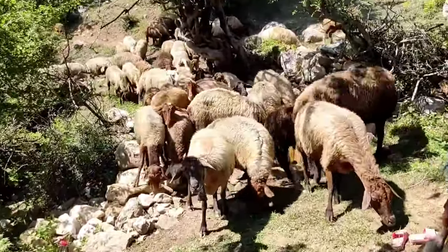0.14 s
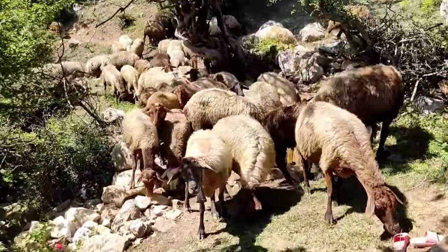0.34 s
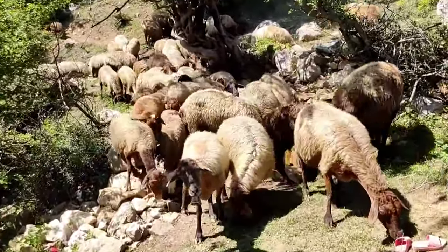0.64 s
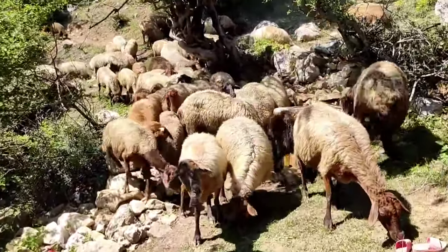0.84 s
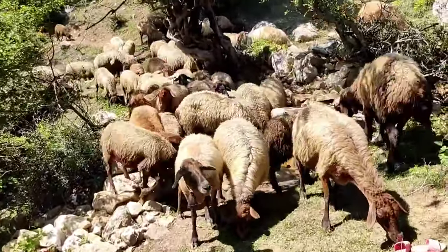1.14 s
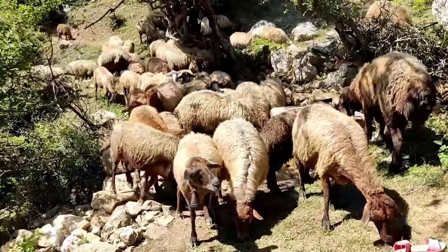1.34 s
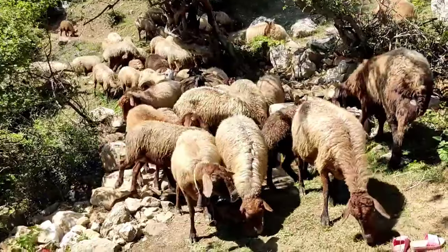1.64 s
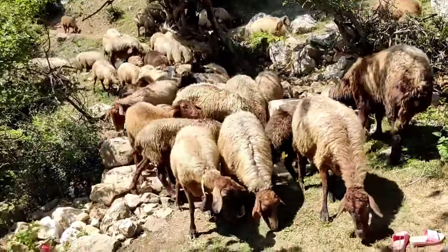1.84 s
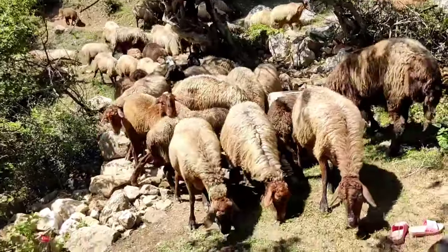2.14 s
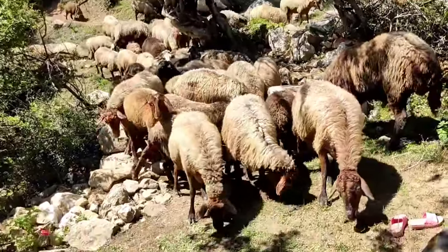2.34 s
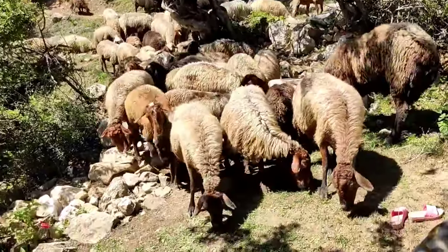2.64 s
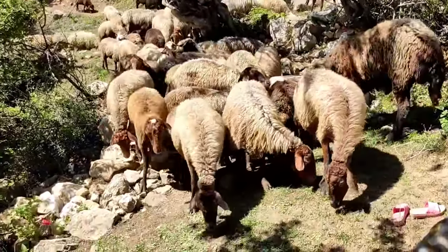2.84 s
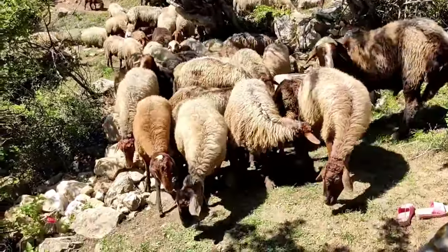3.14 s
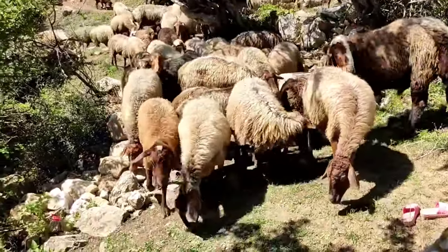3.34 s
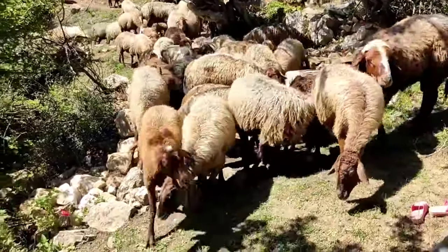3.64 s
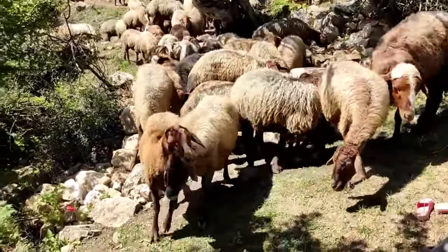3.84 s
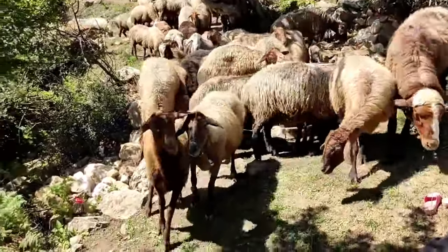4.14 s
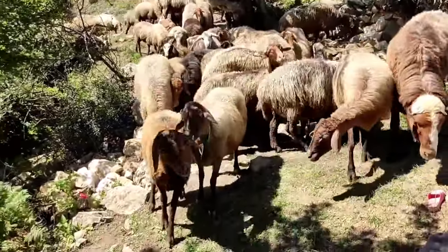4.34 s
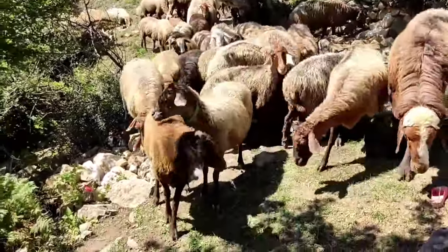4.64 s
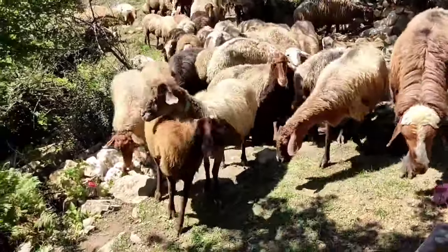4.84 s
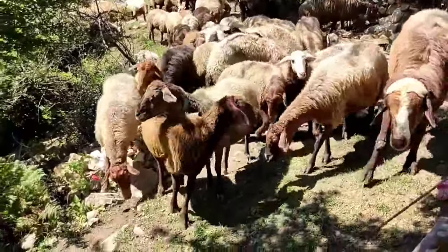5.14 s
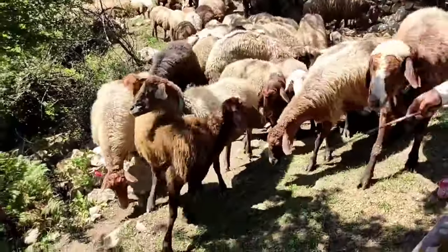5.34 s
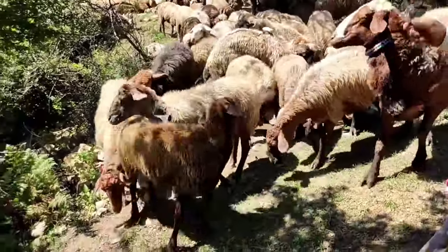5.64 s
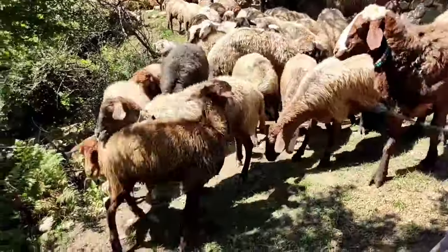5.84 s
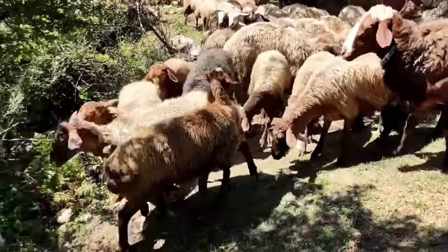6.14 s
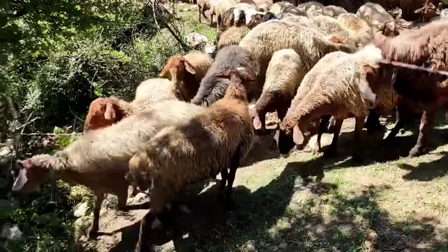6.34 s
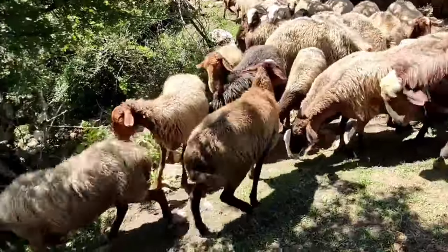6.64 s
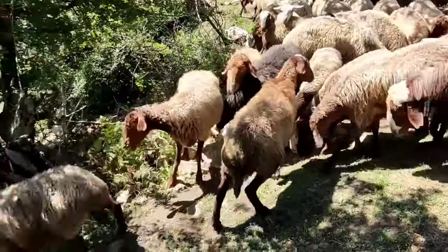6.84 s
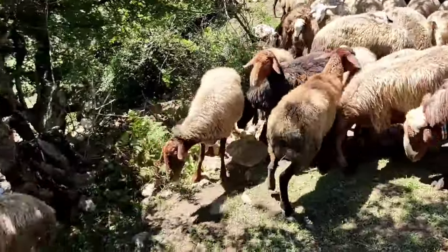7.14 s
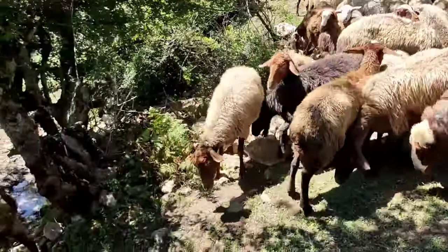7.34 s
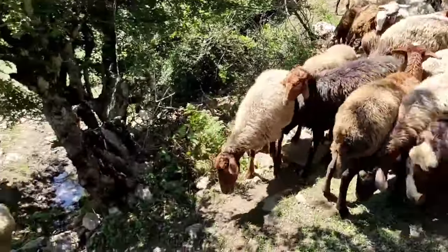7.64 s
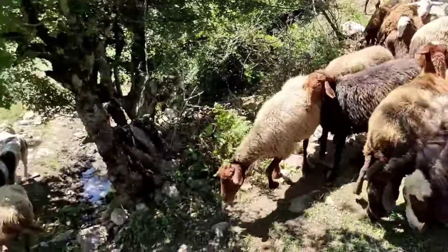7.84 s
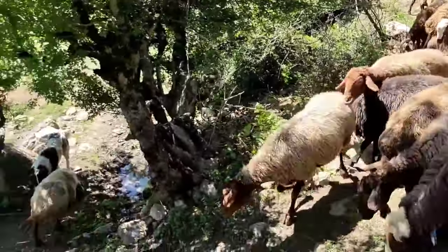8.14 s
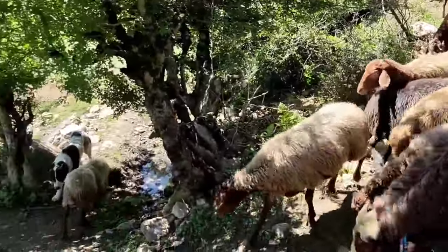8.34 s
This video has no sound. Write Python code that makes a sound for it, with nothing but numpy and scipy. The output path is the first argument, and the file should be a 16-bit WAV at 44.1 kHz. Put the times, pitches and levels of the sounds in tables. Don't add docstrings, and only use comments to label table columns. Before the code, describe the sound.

Outdoors on a breezy slope, wind rumbles and slaps a handheld stereo microphone. Dull distant bells and hoof knocks come first, with light metal grazes and a faint bird chirp. After two seconds a nearby sheet-metal bell clanks irregularly, bright and rattly with a short hollow ring. Two snorts follow closely, then a long sniff ends in a stronger snort, and later a weaker one and a sharp twig tick.

```python
import sys
import numpy as np
from scipy import signal
from scipy.fft import rfft, irfft, next_fast_len
from scipy.io import wavfile
from scipy.ndimage import uniform_filter1d, map_coordinates

SR = 44100
rng = np.random.default_rng(int(sys.argv[2]) if len(sys.argv) > 2 else 0)


def file_out(sig):
    cols = np.atleast_2d(sig).T
    lim = np.clip(cols, -1, 1)
    pcm = np.round(lim * 32767).astype(np.int16)
    wavfile.write(sys.argv[1], SR, pcm)


def voltage_ratio(decibels):
    exponent = np.asarray(decibels, float) / 20
    return 10 ** exponent


N = 373968

# time_s, level_db
BUFFET_LEVEL = [(0, -31), (.5, -30), (.95, -43.5), (1.3, -45.5), (2.7, -41.5), (3.1, -33.5), (3.8, -37),
                (4.4, -42), (4.8, -38), (5.6, -28.5), (6.3, -32.5), (7.15, -47.5), (7.7, -30.5), (8.1, -32),
                (8.48, -39.5)]
# time_s, gain_db
EDDIES = [(.1, 3.5), (.65, 2.5), (.897, 5), (2.5, 2.5), (2.75, -16), (3.02, 2), (3.179, 2.5), (3.3, -10),
          (3.42, -3), (3.6, 1), (3.8, 5.5), (3.94, -5), (4.055, 4), (4.8, 7.5), (4.98, -8), (5.09, -0.5),
          (5.23, 2), (5.518, 3.5), (5.655, 4), (7.719, 1.5), (7.885, 2), (7.965, 3.5), (8.27, -2.5),
          (4.62, 4.5), (4.7, 1.5), (4.88, -2), (8.19, 2.5)]
# peak_s, peak_db, pitch_hz, left_minus_right_db
SLAPS = [(0.029, -26.5, 80.7, -12.5), (0.096, -30.5, 130, 16), (0.301, -41, 83.4, 0),
         (0.395, -35, 87, -0.5), (0.638, -34, 80.7, -6), (3.013, -31.5, 96, -29), (3.413, -34.5, 113, -19),
         (3.598, -34, 107, -9), (4.048, -38.5, 143, 16.0), (4.777, -32, 112, 14),
         (5.083, -33.5, 121, -13.0), (5.222, -40, 180, 12.5), (5.46, -29, 80.7, 4), (5.514, -24.5, 127, 10),
         (5.709, -33, 105, 14), (6.271, -39, 116, -14), (7.717, -25, 143, 33), (7.878, -28, 120, 11),
         (7.96, -23, 82, -12), (8.126, -35.5, 128, -15.5), (8.181, -31, 96, -19), (8.264, -36, 78.5, -6.5)]
# freq_hz, level_db
BUFFET_SPECTRUM = [(8.8, -45), (15, 4.5), (32, 5.5), (75, 1.5), (103, -10.5), (130, -14), (170, -17.5),
                   (290, -120)]
# freq_hz, level_db
FLUTTER_SPECTRUM = [(53, -17), (90, 0.5), (200, -13.5), (242, -13.5), (359, -29.5), (500, -30.5),
                    (650, -57), (1100, -120)]
# time_s, level_db
RUSTLE_LEVEL = [(0, -42), (.3, -46), (1.8, -49), (3.0, -45.5), (3.5, -47.5), (5.2, -44), (5.75, -36.5),
                (6.3, -46), (7.0, -50), (8.08, -43), (8.48, -49)]
# freq_hz, level_db
HISS_SPECTRUM = [(2650, -17), (5480, -13.5), (7190, -6), (8320, -2.5), (10400, -5), (11400, -10),
                 (14000, -15), (15000, -68)]
# freq_hz, left_minus_right_db
HISS_LEAN = [(4400, -0.5), (7500, -3.5), (9000, -4.5), (10500, 6.5), (14000, 2.5)]
# start_s, hold_s, peak_db, rise_db_per_s, fall_db_per_s
PUFFS = [
    (2.467, 0.039, -24.5, 208, 400),
    (5.926, 0.011, -29, 258, 236),
    (6.57, 0.011, -41, 123, 150),
    (6.86, 0.0012, -43, 1500, 897),
    (7.475, 0.0079, -55, 198, 155),
    (4.256, 0.013, -63, 300, 500),
    (5.31, 0.0035, -41.5, 1487, 503),
]
# freq_hz, level_db
MURMUR_SPECTRUM = [(200, 4), (300, 1), (950, -1.5), (2200, -8), (3000, -30), (4200, -9), (7500, -50),
                   (12000, -120)]

# start_s, peak_db
LEADER = [(0.065, -38.5), (0.4302, -43), (0.7594, -43.5), (1.111, -40.5), (1.5196, -44.5), (2.0508, -49.5),
          (2.9, -43), (4.0619, -43), (4.9152, -45), (5.0959, -39), (5.3852, -49), (5.568, -47),
          (6.1312, -46), (7.505, -48.5), (7.649, -42)]
# start_s, peak_db, pitch_hz
DEEP = [(0.059, -43, 791), (0.237, -52, 817), (0.604, -53, 836), (1.29, -45, 811), (4.01, -45, 824),
        (4.185, -51, 778), (6.822, -55, 826), (6.999, -47.5, 820), (7.16, -41.5, 810), (7.392, -48.5, 816),
        (7.664, -52, 794), (7.969, -49, 790), (8.099, -49, 800)]
# start_s, peak_db
HIGH = [
    (2.2483, -41),
    (2.4892, -42.5),
    (2.641, -39),
    (3.044, -40.5),
    (3.2708, -47),
    (3.362, -39),
    (4.465, -41),
    (5.6856, -44),
    (6.943, -48),
]
# start_s, peak_db, pitch_hz
STRAY = [(.15, -48, 809), (.18, -48, 960), (.68, -54, 1070), (.9, -57, 827), (1.3, -56, 902),
         (1.65, -51, 995), (1.7, -57, 880), (1.92, -48, 897), (2.4, -40.5, 926), (4.95, -50, 1040),
         (5.38, -57, 1053), (5.8, -47, 898), (7.7, -48, 918), (8.067, -47, 917), (8.249, -50, 905)]
# start_s, peak_db, pitch_hz
FAINT = [
    (.42, -56, 4580),
    (.59, -55, 4640),
    (.672, -47, 5230),
    (1.003, -53, 5280),
    (1.404, -53, 5180),
    (1.5, -56, 4320),
    (2.845, -49, 1717),
]

# start_s, length_s, level_db, start_hz
CHIRPS = [
    (1.24, .1, -55, 6100),
    (2.96, .07, -56, 6300),
    (7.49, .08, -56, 6800),
    (8.15, .06, -51, 5900),
]
# start_s, peak_db, knock_hz
HOOVES = [(0.507, -39, 850), (1.244, -37, 755), (1.421, -48.5, 1380), (2.904, -34, 1050), (3.802, -37, 410),
          (5.02, -40, 508), (5.327, -39.5, 483), (5.513, -28.5, 588), (5.725, -31.5, 940),
          (6.451, -37, 1010), (7.02, -37, 590)]
# start_s, peak_db
TWIGS = [
    (.0204, -19),
    (.156, -34),
    (.8275, -35),
    (2.846, -33),
    (2.905, -32),
    (5.3068, -30),
    (7.9195, -14),
]
# freq_hz, level_db
SNIFF_SPECTRUM = [(5000, -44), (7600, -24), (8400, -4), (9200, -11), (10300, -2), (11500, -12),
                  (14000, -13), (16000, -74)]
# start_s, hold_s, level_db, nose_start_hz, nose_end_hz
SNORTS = [
    (2.325, 0.044, -42.5, 2050, 2100),
    (2.458, 0.058, -32, 1980, 2040),
    (5.928, 0.032, -26.5, 5950, 2300),
    (7.481, 0.026, -35, 2780, 1640),
]
# resonance_width_ratio, flap_hz, flap_db
NOSTRILS = [
    (15.8, 225, 12),
    (28, 200, 9),
    (1.77, 180, -30),
    (0.169, 520, -16),
]

# start_s, ring_db, mouth_db
BLOWS = [(2.2483, -16.5, -20), (2.638, -14.5, -15.5), (3.039, -25.5, -41.5), (3.1975, -14.5, -23),
         (3.3607, -16.5, -18), (3.5339, -18.5, -18), (3.8511, -11, -12), (3.921, -15.5, -15),
         (4.07, -17, -23.0), (4.3002, -11, -17), (4.4658, -17, -29), (4.489, -20.2, -63.0),
         (4.6689, -25.5, -21.5), (5.679, -14, -38), (6.0036, -22.5, -32), (6.3637, -17, -22),
         (6.3907, -17.5, -46), (6.6199, -17, -7.5), (6.733, -15, -21.5), (6.9424, -17.5, -33),
         (7.014, -25, -25.0), (7.154, -17.5, -27.5), (7.9848, -19, -23), (8.461, -15.5, -18.5)]
LANDINGS = [(1.8, -0.06, -0.27, 0.25), (1.81, 0.61, -1.05, 0.11), (-0.2, 0.19, 0.85, -1.54),
            (-0.09, 0.38, 0.74, -0.75), (0.93, -0.18, 0.99, -0.77), (-0.84, -0.7, 0.74, -0.52),
            (-0.27, 0.23, 0.57, -0.18), (0.03, -0.58, -0.08, -1.6), (2.26, 2.64, -1.65, 0.29),
            (0.45, 1.07, -0.78, 0.51), (-1.05, 1.16, -0.24, -0.07), (-0.55, 0.74, 0.05, 0.03),
            (-0.21, -0.07, 0.1, -0.98), (-0.53, -0.66, -0.74, 0.08), (-0.16, -0.03, 0.05, -0.09),
            (0.47, -0.23, -0.04, -0.28), (-0.49, 0.55, -0.29, -0.83), (-0.08, -0.64, -0.4, -1.19),
            (1.24, 1.26, -0.72, -0.69), (-0.61, -0.73, 0.0, 0.09), (-0.63, -1.03, 0.04, -0.94),
            (-0.51, 0.43, 0.22, -0.87), (0.79, 0.78, -0.44, -0.53), (-0.01, -1.82, 0.69, 0.41)]
# start_s, ring_db, mouth_db, height, round_rim (relative units)
GRAZES = [(0.0538, -27.5, -39, 0.081, 0.5), (0.177, -25.5, -50, 0.19, -0.82),
          (1.289, -28, -65.0, -0.46, -0.58), (1.6465, -30, -47, 0.41, 0.57),
          (2.0342, -30.5, -60, 0.19, -0.32), (2.34, -33, -30, 0.56, 0.3),
          (3.456, -22, -26.5, -0.019, -0.34), (3.5959, -22, -35.0, -0.67, -0.66),
          (3.649, -29, -27.5, 0.038, 0.089), (4.0035, -32, -65.0, -0.47, -0.56),
          (4.3989, -24, -20.5, -0.54, -0.76), (4.7037, -24, -27.5, -0.24, 0.65),
          (5.7999, -23, -40, 0.3, -0.077), (6.03, -26.5, -61, 0.19, -0.62),
          (6.2149, -27, -30.0, 0.079, -0.14), (6.2496, -24, -35.5, 0.98, 0.81),
          (6.42, -25.5, -23.5, -0.49, -0.64), (6.475, -32.5, -36.5, 0.12, -0.44),
          (6.826, -29, -30.5, 0.45, 1.1), (7.338, -28.5, -30, 0.54, 0.66),
          (7.659, -33, -30.5, -0.27, -0.44), (7.825, -32, -35, 1, -0.083), (8.1836, -24, -48, -0.02, 0.16),
          (8.225, -30, -38.5, -0.9, -1.26), (8.367, -32.5, -46, 0.96, -1.1),
          (3.797, -31.5, -47, 0.1, 0.093),
    (5.704, -32, -62, 0.1, 0.1),
    (5.732, -30, -45, 0.1, 0.1),
    (6.968, -27, -60, 0.09, 0.1),
    (7.041, -30.5, -60, -0.1, 0.1),
    (7.931, -27.5, -55, 0.1, 0.091),
    (8.005, -26.5, -60, 0.1, 0.1),
]
WALL_HZ = [1650, 2406, 2541, 2632, 2842, 3025, 3171, 3478, 3714, 3957, 4094, 4352, 4506, 4618, 4825, 5297,
           5373, 5742, 5997, 6110, 6325, 6815, 6944, 7402, 7601, 7948, 8505, 8590, 8984, 9625, 9856, 10120,
           10524, 11019, 11325, 11730, 12015, 12270, 12720, 13300]
# level_db, t60_s
WALL_MODES = [(-37, 0.25), (-40, 0.34), (-42.0, 0.32), (-42.7, 0.25), (-33.5, 0.31), (-34, 0.28),
              (-39.5, 0.089), (-40.5, 0.089), (-36, 0.17), (-38, 0.1), (-28.5, 0.27), (-22, 0.36),
              (-39, 0.106), (-23, 0.24), (-22, 0.26), (-18.5, 0.36), (-19.5, 0.21), (-35, 0.091),
              (-36.3, 0.2), (-22, 0.14), (-27.5, 0.15), (-19.5, 0.17), (-24, 0.23), (-12.5, 0.17),
              (-10.5, 0.18), (-8.5, 0.13), (-10.5, 0.12), (-15, 0.13), (-33, 0.16), (-12, 0.098),
              (-4.5, 0.082), (-2, 0.032), (-20.5, 0.1), (-24, 0.073), (-14, 0.041), (-21, 0.082),
              (-14, 0.087), (-11, 0.039), (-36.3, 0.15), (-22, 0.14)]
# height_db, round_rim_db, slant_db, flatness_db
WALL_SHAPES = [(-0.5, -1.7, 1.8, -4.3), (0.1, -1.2, -0.9, -2.7), (1.9, -1.5, -2.7, -2.4),
               (0.2, -1.5, -3.3, -3.1), (3.7, 1.3, -1.6, -2.0), (-3.9, 1.6, 4.3, -8.0),
               (5.2, -1.2, 7.3, -7.8), (0.9, 3.7, 6.0, 2.1), (-1.9, -0.3, -1.1, -2.2),
               (-4.5, -0.6, 3.1, 2.9), (-7.4, 3.2, 15.3, 1.0), (-0.4, 3.1, 6.7, 8.1), (1.5, 1.4, 1.4, -0.3),
               (5.8, 5.2, 9.0, -3.0), (-1.1, -6.8, -3.7, -6.1), (1.5, -1.5, 1.2, 4.3),
               (-3.4, -4.5, -3.7, 4.1), (-0.8, -2.6, -1.2, 1.1), (2.2, -0.2, 0.7, -0.3),
               (-1.0, 1.3, 0.5, -1.8), (2.6, 3.3, -0.0, 0.9), (-1.0, -3.9, 2.0, -4.9),
               (-0.7, -0.6, -0.0, -0.4), (-1.6, 1.0, -4.1, 1.7), (0.5, -3.1, 3.7, 7.3),
               (-7.3, 6.5, -3.8, 10.1), (-2.6, 3.2, -6.9, -11.3), (2.8, -1.5, -10.6, -6.4),
               (-0.5, -0.3, 0.0, 0.0), (3.5, -1.1, 1.7, 6.5), (1.7, -1.0, -1.2, 1.3), (2.2, 0.1, 4.0, -4.3),
               (4.9, -0.2, 0.2, 5.2), (5.5, 1.2, -1.5, 1.7), (2.6, -0.4, -4.9, 5.3),
               (-3.4, -0.5, -0.7, -0.2), (0.2, -0.9, 3.9, -3.0), (-5.0, 3.5, 0.6, 1.6),
               (-0.0, -0.2, -2.5, 0.3), (2.5, -1.8, -2.2, 1.0)]
# freq_hz, level_db
CLACK_SPECTRUM = [(700, -7), (2000, -4), (3400, -13.5), (5000, -5.5), (6000, -14.5), (8500, -1.5),
                  (10500, -2.5), (12300, -5), (14000, -10.5)]
# freq_hz, left_minus_right_db
BELL_LEAN = [(1050, 0), (4700, -4.5), (5400, -3), (6800, -5.5), (7700, -7.5), (8600, -9), (9900, 7),
             (13000, 3.5)]
# freq_hz, left_lead_rad
BELL_TURN = [(1000, 1.1), (3000, 1.7), (8000, 1.1), (12000, .8)]
# freq_hz, threshold_db
DROPOUT = [(1400, -16), (1900, -11), (2400, -9), (2900, 0), (3800, 1), (4500, -3), (5800, 3), (6600, -1),
           (12000, -4), (14000, -9)]

MOUTH_HZ, LEADER_HZ, HIGH_HZ = 1033, 931, 1132
EDDY_S, FLUTTER_DB, FLUTTER_GROWTH = 0.05, -8, 1.87
SLAP_DECAY_S, SLAP_LATE_S, SLAP_GAIN_DB, SLAP_PITCH_RATIO = .006, .005, 5, 1.35
KNOCK_T60_S = .06
SNIFF_START_S, SNIFF_LENGTH_S, SNIFF_EDGE_S = 5.4, 0.528, 0.03
SNIFF_DB, SNIFF_SWELL_DB = -34, 8.5
SNIFF_BURST_DB, SNIFF_BURST_S, SNIFF_FLAP_HZ = 11.5, .016, 205
SNORT_ATTACK_S, SNORT_RELEASE_S, SNORT_EDGE_DB = .035, 0.047, -32
UPPER_NOSE_RATIO, UPPER_NOSE_DB = 1.87, -16.5
SWING_DB = 5
MOUTH_SCATTER_RAD = .1


def unit(x):
    return x / np.sqrt(np.mean(x ** 2) + 1e-20)


def along(points, hz):
    f, v = np.transpose(points)
    return np.interp(np.log(hz + 1), np.log(f + 1), v)


def level_curve(points):
    s, db = np.transpose(points)
    return np.interp(np.arange(N) / SR, s, db)


def bumps(events, width_s):
    t = np.arange(0, N + 32, 32) / SR
    total = sum(db * np.exp(-((t - s) / width_s) ** 2 / 2) for s, db in events)
    return np.interp(np.arange(N) / SR, t, total)


def wobble(rate_hz, count=N):
    knots = rng.standard_normal(int(count * rate_hz / SR) + 4)
    return map_coordinates(knots, [np.arange(count) * rate_hz / SR])


def filtered(x, response):
    m = next_fast_len(N + SR // 2)
    return irfft(rfft(x, m) * response(np.fft.rfftfreq(m, 1 / SR)), m)[..., :N]


def rush(spectrum, alike, patchy_db):
    z = signal.stft(rng.standard_normal((2, N)), nperseg=512)[2]
    field = uniform_filter1d(rng.standard_normal(z.shape[1:]), size=6, axis=0)
    field = uniform_filter1d(field, size=10, axis=1)
    a, b = signal.istft(z * voltage_ratio(patchy_db * unit(field)), nperseg=512)[1][:, :N]
    turn = np.arccos(np.clip(alike, -1, 1)) / 2
    pair = np.cos(turn) * a + np.sin(turn) * np.array([b, -b])
    return unit(filtered(pair, lambda hz: voltage_ratio(along(spectrum, hz))))


def add(track, s, sound):
    part = track[..., round(s * SR):][..., :sound.shape[-1]]
    part += sound[..., :part.shape[-1]]


def ring(hz, db, t60_s, attack_s, scatter_rad, rough_db=3.0, in_step=False, longest_s=.27):
    hz, db, t60_s = (np.reshape(v, (-1, 1)) for v in (hz, db, t60_s))
    count = next_fast_len(int(SR * min(.85 * t60_s.max(), longest_s)), True)
    t = np.arange(count) / SR
    draws = 1 if in_step else hz.shape
    phase = rng.uniform(0, 2 * np.pi, draws)
    stray = scatter_rad * rng.standard_normal(draws)
    knots = rng.standard_normal((2, len(hz), 24), np.float32)
    swell, slip = signal.resample(knots, count, axis=2)
    fade = voltage_ratio(np.float32(db - 60 * t / t60_s + rough_db * swell)) * (1 - np.exp(-t / attack_s))
    cycle = 2 * np.pi * hz * t + phase + rough_db / 4 * slip
    lean = (along(BELL_LEAN, hz) + SWING_DB * scatter_rad * rng.standard_normal(draws)) / 2
    turn = (along(BELL_TURN, hz) + stray) / 2
    ports = [fade * voltage_ratio(k * lean) * np.sin(np.float32(cycle + k * turn)) for k in (1, -1)]
    return np.array([port.sum(0) for port in ports])


def slaps():
    out, t = np.zeros((2, N)), np.arange(-2000, 2000) / SR
    for (s, db, hz, pan_db), phase in zip(SLAPS, rng.uniform(0, 2 * np.pi, len(SLAPS))):
        share = voltage_ratio([[pan_db / 2], [-pan_db / 2]])
        envelope = np.exp(-np.abs(t) / SLAP_DECAY_S) + np.exp(-np.abs(4 * t) / SLAP_DECAY_S)
        crest = envelope * 0.65 * np.cos(2 * np.pi * SLAP_PITCH_RATIO * hz * t + phase)
        add(out, s + SLAP_LATE_S, voltage_ratio(db + SLAP_GAIN_DB) * 2 * share / share.sum() * crest)
    return np.roll(out, -len(t) // 2, axis=1)


def wind():
    eddy_db = bumps(EDDIES, EDDY_S)
    buffet_db = level_curve(BUFFET_LEVEL) + eddy_db
    flutter_db = buffet_db + (FLUTTER_GROWTH - 1) * eddy_db + FLUTTER_DB
    slow, fast = (2 * np.tanh(np.array([wobble(rate), wobble(rate)]) / 2) for rate in (9, 30))
    buffet = unit(voltage_ratio(2.5 * slow + 1.6 * fast) * rush(BUFFET_SPECTRUM, alike=-0.017, patchy_db=-1.44))
    flutter = unit(voltage_ratio(3.1 * slow + 6.4 * fast) * rush(FLUTTER_SPECTRUM, alike=0.029, patchy_db=1.1))
    return voltage_ratio(buffet_db + [[-1.2], [.6]]) * buffet + voltage_ratio(flutter_db) * flutter + slaps()


def murmur():
    return voltage_ratio(-52.0 + wobble(2.87) + wobble(26)) * rush(MURMUR_SPECTRUM, alike=0.38, patchy_db=4.0)


def rustle():
    t = np.arange(N) / SR
    level = voltage_ratio(level_curve(RUSTLE_LEVEL))
    for s, hold_s, db, rise, fall in PUFFS:
        drop_db = np.maximum(np.maximum(rise * (s - t), fall * (t - s - hold_s)), 0)
        level = level + voltage_ratio(db - drop_db)
    hiss = level * voltage_ratio(wobble(30) + wobble(10)) * rush(HISS_SPECTRUM, alike=0.49, patchy_db=2.2)
    return filtered(hiss, lambda hz: voltage_ratio(np.outer([.5, -.5], along(HISS_LEAN, hz))))


def back_of_flock(count=420):
    out, t = np.zeros((2, N)), np.arange(SR // 4) / SR
    for s, pitch, size, life, left in rng.random((count, 5)):
        hz = 1600 * 4.2 ** pitch ** .6
        fade = voltage_ratio(-52.5 - 12 * size - 60 * t / (.3 + .5 * life)) * (1 - np.exp(-t / .003))
        add(out, s * N / SR, fade * np.sin(2 * np.pi * hz * t) * [[left], [1 - left]])
    return out


def far_bells():
    out = np.zeros((2, N))
    leader = [(*row, LEADER_HZ) for row in LEADER]
    high = [(*row, HIGH_HZ) for row in HIGH]
    # events, partial ratios, partial levels_db, t60_s
    bells = [(leader, [1, 1.115, 5.62], [3, -5, -11], [.45, .5, .5]),
             (high, [1, 5.3], [3, -12], [.7, .3]),
             (DEEP, [1, 1.03], [3, -5], .45),
             (STRAY, [1], [0], .75),
             (FAINT, [1], [0], .5)]
    for rows, ratios, dbs, t60_s in bells:
        for s, db, hz in rows:
            tone = ring(hz * np.array(ratios), db + np.array(dbs), t60_s, attack_s=0.0021,
                        scatter_rad=0.3, rough_db=1.4, longest_s=.45)
            add(out, s - .004, tone)
    return out


def bird():
    out = np.zeros((2, N))
    for s, length_s, db, start_hz in CHIRPS:
        u = np.arange(int(length_s * SR)) / (length_s * SR)
        hz = start_hz + (7600 - start_hz) * np.sin(u * np.pi / 2)
        level = voltage_ratio(db + 8 + 3 * wobble(52, count=len(u))) * np.sin(np.pi * u)
        add(out, s, level * np.sin(2 * np.pi * np.cumsum(hz) / SR))
    return out


def feet():
    out, t = np.zeros((2, N)), np.arange(2000) / SR
    for s, db, hz in HOOVES:
        band = signal.butter(2, [hz / 2.54, hz * 1.54], "band", fs=SR)
        knock = signal.lfilter(*band, rng.standard_normal(len(t)))
        add(out, s, voltage_ratio(db - 60 * t / KNOCK_T60_S) * unit(knock) * [[1], [.9]])
    band = signal.butter(2, [3200, 12500], "band", fs=SR)
    for s, db in TWIGS:
        tick = signal.lfilter(*band, rng.standard_normal((2, len(t))))
        add(out, s, voltage_ratio(db - 60 * t / .016) * tick)
    return out


def sniff():
    u = np.arange(N) / SR - SNIFF_START_S
    outside_s = np.maximum(-u / 2, 0) + np.maximum(u - SNIFF_LENGTH_S, 0)
    swell_db = SNIFF_SWELL_DB * (1 - np.clip(u / SNIFF_LENGTH_S, 0, 1)) ** 2
    level_db = SNIFF_DB - swell_db - 20 * (outside_s / SNIFF_EDGE_S) ** 2
    level_db = level_db + bumps([(SNIFF_START_S + SNIFF_LENGTH_S, SNIFF_BURST_DB)], SNIFF_BURST_S)
    flutter_db = wobble(40) + 2 * wobble(2 * SNIFF_FLAP_HZ)
    return voltage_ratio(level_db + flutter_db) * rush(SNIFF_SPECTRUM, alike=0.7, patchy_db=4)


def snorts():
    out, t = np.zeros((2, N)), np.arange(SR // 4) / SR
    for (s, hold_s, db, start_hz, end_hz), (width, flap_hz, flap_db) in zip(SNORTS, NOSTRILS):
        length_s = SNORT_ATTACK_S + hold_s + SNORT_RELEASE_S
        f, frames, z = signal.stft(rng.standard_normal((2, len(t))), SR, nperseg=256)
        f = f[:, None]
        centre = np.interp(frames, [0, length_s], [start_hz, end_hz])
        nose = 1 / (1 + ((f / centre - centre / (f + 1)) / width) ** 2)
        upper = 1 / (1 + ((f / centre - UPPER_NOSE_RATIO) / (0.56 * width)) ** 4)
        nose = nose + voltage_ratio(UPPER_NOSE_DB) * upper
        a, b = signal.istft(z * nose, SR, nperseg=256)[1][:, :len(t)]
        cycle = np.cumsum(flap_hz * voltage_ratio(0.67 * wobble(65, count=len(t)))) / SR % 1
        chopped = (.5 + np.exp(-4 * cycle)) * unit(np.array([a + .5 * b, a - .5 * b]))
        flap = voltage_ratio(flap_db) * np.exp(-5 * cycle) * np.sin(3 * np.pi * cycle)
        attack = np.maximum(1 - t / SNORT_ATTACK_S, 0)
        release = np.maximum(1 + (t - length_s) / SNORT_RELEASE_S, 0)
        add(out, s - SNORT_ATTACK_S, voltage_ratio(db + SNORT_EDGE_DB * (attack + release)) * (chopped + flap))
    return out


def near_bell():
    out, rattle = np.zeros((2, N)), np.zeros((2, N))
    level_db, t60_s = np.transpose(WALL_MODES)
    shapes = np.array(WALL_SHAPES)
    t = np.arange(4000) / SR
    blows = [(*blow, *spot) for blow, spot in zip(BLOWS, LANDINGS)]
    for s, db, mouth_db, *spot in blows + GRAZES:
        wall_db = db + level_db + np.dot(shapes[:, :len(spot)], spot) + 0.35
        wall_t60_s = t60_s * voltage_ratio(rng.normal(0, 1.5, len(t60_s)))
        add(out, s, ring(WALL_HZ, wall_db, wall_t60_s, attack_s=.002, scatter_rad=.9, rough_db=2.6))
        minor_hz = rng.uniform(3700, 13500, 26)
        minor_db = db + along(CLACK_SPECTRUM, minor_hz) - 18.5 + rng.normal(0, 3.6, minor_hz.shape)
        add(out, s, ring(minor_hz, minor_db, 0.15, attack_s=0.00045, scatter_rad=0.47))
        click_and_wash = voltage_ratio(-60 * t / 0.00081) + voltage_ratio(-5.5 - 60 * t / 0.085)
        add(rattle, s, voltage_ratio(db - 2.1) * rng.standard_normal((2, len(t))) * click_and_wash)
        mouth = ring(MOUTH_HZ * np.array([1.003, 1]), [mouth_db - 2.5, mouth_db - 6], [.2, .36],
                     attack_s=0.004, scatter_rad=MOUTH_SCATTER_RAD, rough_db=.5, in_step=True)
        add(out, s, mouth)

    def clack(hz):
        return voltage_ratio(along(CLACK_SPECTRUM, hz) + np.outer([.5, -.5], along(HISS_LEAN, hz)))

    return out + filtered(rattle, clack)


def slope(x):
    t = np.arange(SR // 4) / SR
    tail = rng.standard_normal((2, len(t))) * voltage_ratio(-60 * t / 0.084)
    treble = filtered(x, lambda hz: .2 + .8 / (1 + (2000 / (hz + 1)) ** 4))
    return signal.fftconvolve(treble, tail / np.linalg.norm(tail[0]), axes=1)[:, :N]


def scene():
    background = wind() + murmur() + rustle()
    flock = back_of_flock() + far_bells() + bird() + feet() + sniff() + snorts() + near_bell()
    return background + flock + voltage_ratio(-13) * slope(flock)


def thinned(x, under_db, chance_db):
    pair = np.array([x[0] + x[1], x[0] - x[1]]) / 2
    hz, _, z = signal.stft(pair, SR, nperseg=2048)
    power = np.abs(z[:, :-1]) ** 2
    bands = power.reshape(2, -1, 8, z.shape[-1]).mean(axis=2)
    centre = hz[4::8, None]
    treble = bands[:, 40:68].mean(axis=1, keepdims=True)
    steady = treble < 4 * np.roll(treble, 1, axis=2)
    whim = uniform_filter1d(rng.standard_normal(bands.shape), size=8, axis=2)
    threshold_db = under_db + along(DROPOUT, centre) + chance_db * whim
    weak = bands < treble * voltage_ratio(2 * threshold_db)
    starved = (centre > 1400) & (centre < 14000) & steady & weak
    z[:, :-1] *= np.repeat(~starved, 8, axis=1)
    mid, side = signal.istft(z, SR, nperseg=2048)[1][:, :N]
    return np.array([mid + side, mid - side])


def top_cut(x):
    return signal.sosfilt(signal.butter(12, 15390, fs=SR, output="sos"), x)


def record(dry):
    x = dry / (1 + np.abs(dry / .98) ** 4) ** (1 / 4)
    x = filtered(x, lambda hz: 1 / (1 + (hz / 14400) ** 60) + voltage_ratio(-57) * (hz < 15400))
    mix = thinned(x, under_db=-14.5, chance_db=13)
    return top_cut(mix)


dry = scene()
out = record(dry)
file_out(out)
```